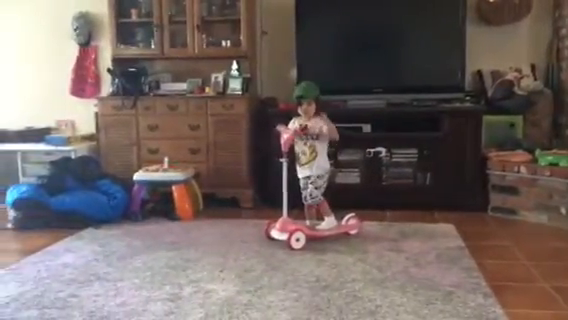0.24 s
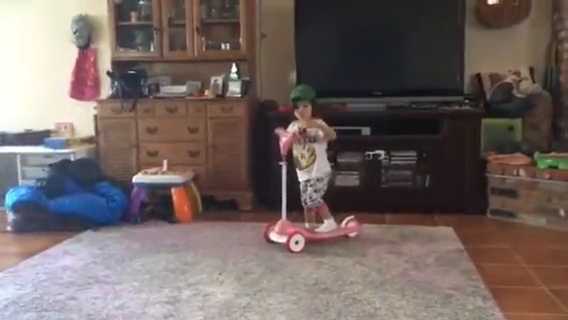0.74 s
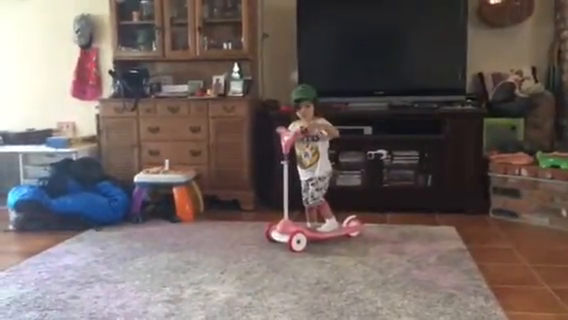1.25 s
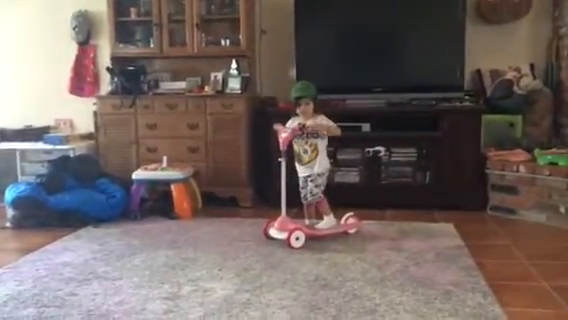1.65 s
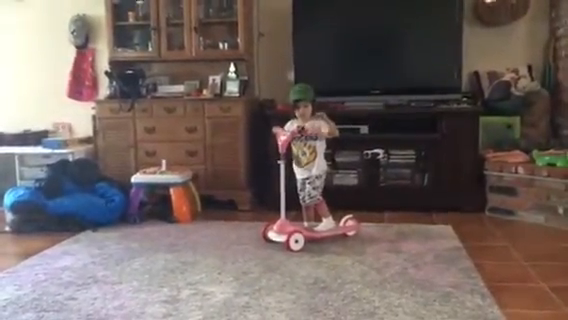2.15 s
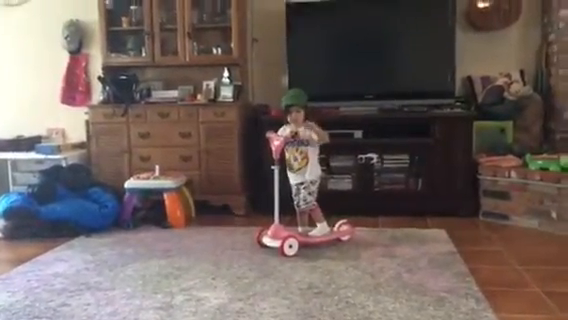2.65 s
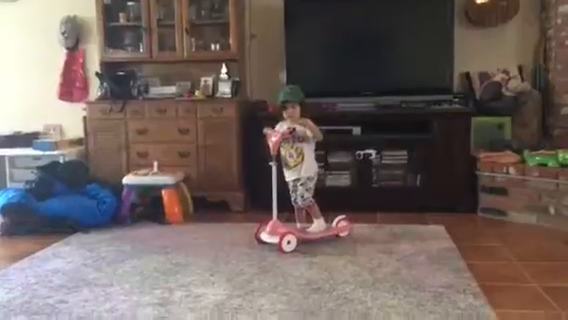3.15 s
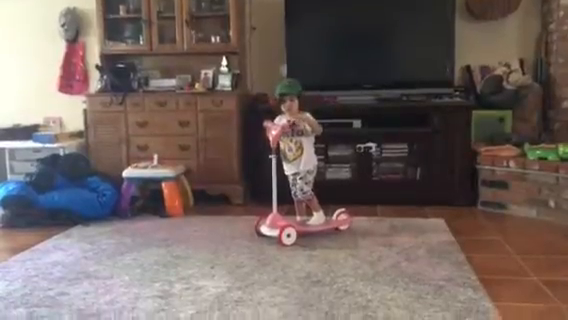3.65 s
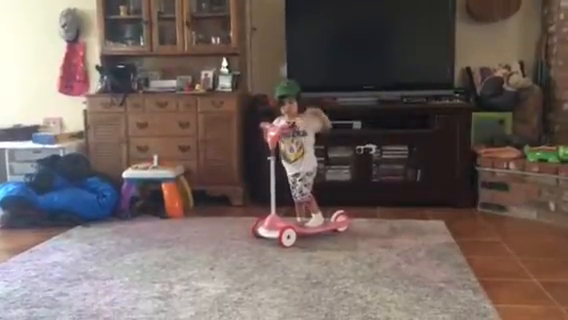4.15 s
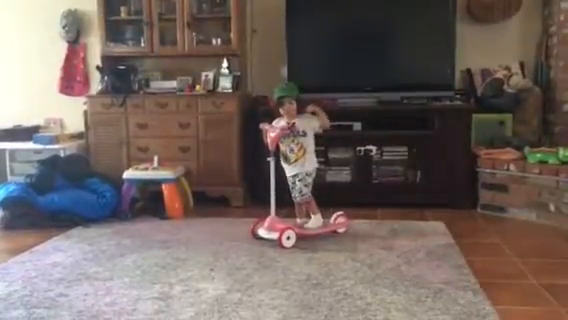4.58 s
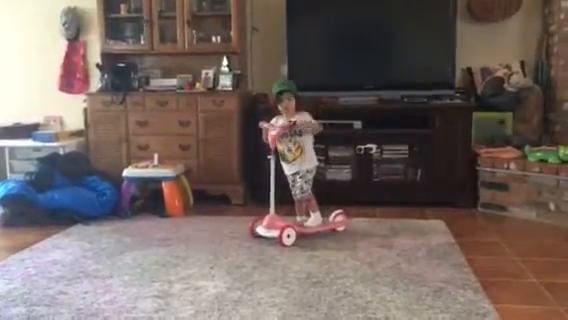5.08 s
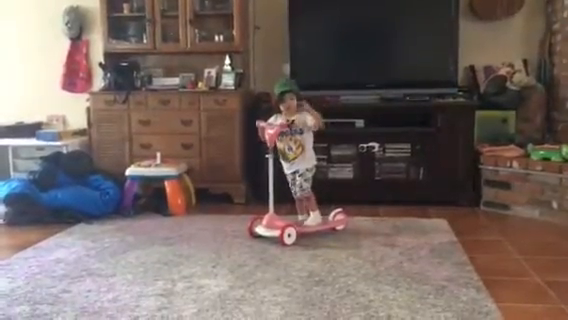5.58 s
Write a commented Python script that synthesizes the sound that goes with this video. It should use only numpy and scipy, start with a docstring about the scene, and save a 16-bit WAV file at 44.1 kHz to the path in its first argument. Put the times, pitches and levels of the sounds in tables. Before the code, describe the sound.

A quiet living room holds a faint low rumble, an appliance hum and a very slight hiss. Right at the start a plastic bell lever gives a light clack, followed by a soft knock. At about 1.7 seconds the lever flicks a small steel scooter bell: a sharp click and a bright, very high ding that rings on, swelling and dipping as it slowly fades. At about 4.1 seconds comes a second, slightly softer ding with a crisp plastic clack; its ring drops away briefly, returns and wavers. At about 5.1 seconds the lever snaps back and grazes the bell, lightly renewing the tone, while the scooter's deck gives a few soft, dull knocks. The ringing is still dying away at the end, near 6 seconds. Tiny dry handlebar ticks are scattered throughout, and the clicks carry a short room echo.

```python
"""In a quiet living room an appliance hums and a child clacks the plastic lever of a small scooter bell.
At 1.7 s the lever flicks a hammer against the steel dome. The dome's few tones ring on, swelling and
fading as the child moves through the room's loud and quiet spots (standing waves).
At 4.1 s the child rings again. At 5.1 s the lever snaps back and grazes the dome,
and the scooter's deck knocks softly while the ringing dies away."""
import sys
import numpy as np
from scipy import signal
from scipy.fft import rfft, irfft
from scipy.io import wavfile

SR = 44100
rng = np.random.default_rng(int(sys.argv[2]) if len(sys.argv) > 2 else 0)


def generate_wav(signal):
    """Clip the signal to [-1, 1] and save it as 16-bit WAV at the path in sys.argv[1]."""
    frames = np.transpose(np.atleast_2d(signal))
    scaled = np.clip(frames, -1, 1) * 32767
    pcm = np.round(scaled).astype(np.int16)
    wavfile.write(sys.argv[1], SR, pcm)


N = 256662
TIME = np.arange(N) / SR
FREQS = np.fft.rfftfreq(4096, 1 / SR)  # pitches in Hz at which a click's tone colour is set

# Blows on the dome; where one lands sets the other tones against the loudest: t/s, ring level/dB,
# crack level/dB, extra for the low pair/dB, extra for the top tone/dB, time to fill the room/s
BLOWS = [(1.683, 0, 1, 1.7, 0, .009), (4.0833, -3, -3.5, 4.1, 0, .018), (5.052, -19, -31, 3.5, -17, .006)]
# The dome's own tones; the lowest two are so close that they beat (pulse against each other):
# f/Hz, base level/dB, t60/s (the time to fade by 60 dB)
DOME_TONES = [(2438.6, -48, 5), (2469.0, -40, 5.4), (6261.4, -17, 2.8), (11360.0, -19, 1.0)]
LOUDEST = 2  # row of the loudest tone


def dome(sway_m=0.0003, shimmer_db=0.43, fill_power=2.2):
    """The struck steel rings with pure tones; small movements of the bell bend the high ones most."""
    delay = sway_m * drift(3.0) / 343  # sound travels 343 m/s
    phases = [2 * np.pi * (hz * (TIME + delay) + rng.random()) for hz, _, _ in DOME_TONES]
    _, ring_db, _, pair_db, top_db, _ = np.transpose(BLOWS)
    blows_db = [ring_db + pair_db, ring_db + pair_db, ring_db, ring_db + top_db]
    out = np.zeros(N)
    for tone, (hz, db, t60) in enumerate(DOME_TONES):
        slowness = (DOME_TONES[LOUDEST][0] / hz) ** fill_power  # low tones fill the room more slowly
        level = ring_level(t60, blows_db[tone], slowness)
        gain, bend = swell(tone)
        out += amp(db + shimmer_db * drift(38)) * level * gain * np.sin(phases[tone] + bend)
    return np.sqrt(2) * (out + sum_tones(phases, blows_db))


def ring_level(t60, blows_db, slowness=1, direct=0.2):
    """Each blow starts the fade afresh; the direct sound comes at once, then the room follows."""
    level, decay = np.zeros(N), amp(-60 * TIME / t60)
    for (s, *_, fill_s), db in zip(BLOWS, blows_db):
        start = round(s * SR)
        old_share = (1 - direct) * np.exp(-TIME[:N - start] / (fill_s * slowness))
        level[start:] = old_share * level[start:] + (1 - old_share) * amp(db) * decay[:N - start]
    return level


# The loudest tone swells in the room's standing waves as the child moves, a curve per blow: t/s, level/dB
SWELL_CURVES = [
    [(1.71, -2), (1.76, -0.1), (2.13, -0.6), (2.28, 4.1), (2.44, 4.4), (2.6, 0.85), (2.77, 4.0),
     (3.72, -3.5), (4.04, 3.5)],
    [(4.11, -1.55), (4.13, 1.5), (4.21, -6.5), (4.27, -27.5), (4.43, -6), (4.56, -11.5), (4.7, -8),
     (4.8, -11.0), (5.01, -8.5)],
    [(5.08, -10), (5.13, -10), (5.18, 1.5), (5.33, -0.9), (5.38, -16.5), (5.41, -8), (5.48, -5), (5.8, -4)],
]
# The two low tones spread in different directions, so as the bell turns one gains on the other
# and their beat deepens: t/s, shift towards the lower tone/dB
LOW_PAIR_BALANCE = [(1.8, -4), (2.05, -1), (2.45, -2), (2.9, -5), (3.3, 6.5), (3.6, 0.9), (4.0, 2),
                    (4.2, 6), (4.45, 0.7), (4.95, -1.4), (5.3, 12), (5.55, 1.1), (5.8, -1.9)]
WAVER_DB, WAVER_HZ = -1.5, 2  # the quieter tones waver a little
SETTLE_DB, SETTLE_S, SETTLE_HZ = 1, .12, 18  # and flutter while the room settles after a blow
THROB_HZ, THROB_STRENGTH, THROB_FADE_S, THROB_PEAK_S = 11.8, 0.61, .4, 0.027  # the top tone's beat


def swell(tone, turn=.8, steps=4096):
    """How strongly one tone reaches the listener, and how its wave shifts as it passes through a fade."""
    t = np.linspace(0, N / SR, steps)
    starts = np.array([s for s, *_ in BLOWS])
    last_blow = np.maximum(np.searchsorted(starts, t) - 1, 0)
    age = abs(t - starts[last_blow])
    if tone == LOUDEST:
        gain = amp(np.interp(t, *np.vstack(SWELL_CURVES).T))
    else:
        waver, settle = (np.interp(t, TIME, drift(hz)) for hz in (WAVER_HZ, SETTLE_HZ))
        gain = amp(WAVER_DB * waver + SETTLE_DB * np.exp(-age / SETTLE_S) * settle)
    if tone < LOUDEST:
        balance_db = np.interp(t, *np.transpose(LOW_PAIR_BALANCE))
        gain *= amp((-1) ** tone * balance_db / 2)  # one goes up as the other goes down
    if tone > LOUDEST:
        depth = np.tanh(THROB_STRENGTH * np.exp(-age / THROB_FADE_S))
        gain *= abs(1 + depth * np.exp(2j * np.pi * THROB_HZ * (age - THROB_PEAK_S)))
    bend = -turn * signal.hilbert(np.log(gain)).imag
    return np.interp(TIME, t, gain), np.interp(TIME, t, bend)


# Dome tones that combine: first row, second row of DOME_TONES
TONE_PAIRS = [(1, 1), (0, 2), (1, 2), (2, 2), (1, 3)]
# The tone that each pair makes: base level/dB, t60/s
PAIR_SUMS = [(-68, 2.8), (-59, 1.7), (-55, 1.8), (-55, 1.4), (-60, 1.2)]


def sum_tones(phases, blows_db, gain_db=-1, flutter_db=1.5):
    """The flexing dome adds faint tones, each at the sum of two of its frequencies."""
    out = np.zeros(N)
    for (a, b), (db, t60) in zip(TONE_PAIRS, PAIR_SUMS):
        level = ring_level(t60, blows_db[a] + blows_db[b])  # adding dB multiplies the two strengths
        out += amp(gain_db + db + flutter_db * drift(7)) * level * np.sin(phases[a] + phases[b])
    return out


# Tone colour of steel hitting steel: f/Hz, relative level/dB
CRACK_COLOUR = [(200, -43.5), (600, -15.5), (1500, -26), (2400, -2.5), (3500, -17.5), (5500, -19),
                (7500, -1.5), (9500, 4), (12000, -0.5), (14000, -0.5), (16000, -13)]


def hammer():
    """Steel meets steel: one sharp, bright crack for each blow."""
    out = np.zeros(N)
    for s, _, db, *_ in BLOWS:
        add(out, s, amp(db) * click(curve_at(CRACK_COLOUR, FREQS)))
    return out


# Clacks of the lever: t/s, relative level/dB, treble tilt/(dB per octave), boost from the hollow/dB
LEVER_CLACKS = [(.0965, -28.5, -4.5, 12.5), (.098, -24.5, 3, 10), (1.6728, -14, 5.5, 18.5),
                (1.6809, -29, -1, -1), (4.0785, -25, 2, 1), (4.081, -52, -8.5, 13.5),
                (4.0835, -11.5, 7, 27.5), (5.0515, -22.5, 2, 8), (5.064, -25.5, -2.5, 27)]
# Tone colour of the plastic: f/Hz, relative level/dB
LEVER_COLOUR = [(150, -9), (320, -6), (560, 4.5), (900, -7), (1150, 6), (1500, -9), (2000, 4.5), (3300, -3),
                (4200, -5.5), (6200, -10), (9000, -4.5), (10500, -12), (11900, -1.5), (15500, -12)]
# The note of the air in the hollow under the dome: f/Hz, half-width/Hz
HOLLOW_NOTE = (2420, 170)


def lever(gain_db=-1, t60=0.026, push=0.21):
    """The plastic lever snaps and stirs the air under the dome."""
    out = np.zeros(N)
    octaves = np.log2(FREQS / np.median(FREQS) + .01)
    hollow_hz, half_width_hz = HOLLOW_NOTE
    hollow = 1 / (1 + ((FREQS - hollow_hz) / half_width_hz) ** 2)
    for s, db, tilt_db, hollow_db in LEVER_CLACKS:
        pulse = click(curve_at(LEVER_COLOUR, FREQS) + tilt_db * octaves + hollow_db * hollow)
        add(out, s, amp(gain_db + db) * np.convolve(pulse, clatter(t60, push)))
    return out


# Ticks of the bell's mount and the handlebar, plus the bright 2-5 kHz edge of the lever's clack at the second
# blow (the loud row at 4.0864 s): t/s, level/dB, f/Hz, width/octaves
HANDLEBAR_TICKS = [(.985, -51, 2600, .2), (1.599, -49, 3400, .15), (2.221, -44, 3400, .5),
                   (2.813, -51, 4200, .4), (3.348, -49, 4000, .4), (4.0864, -15, 3800, .6),
                   (4.3115, -43, 5500, .7), (4.3505, -37, 4000, .8), (4.752, -48, 12500, .3),
                   (5.2765, -41, 4400, .2), (5.51, -46, 11500, .3)]


def handlebar():
    """The bell's mount and the handlebar give small, dry ticks; the lever's clack at the second blow gets its
    bright edge here too."""
    return taps(HANDLEBAR_TICKS, t60=0.032)


# Knocks of the scooter's deck: t/s, level/dB
DECK_KNOCKS = [(.43, -42), (4.971, -43.5), (5.143, -39.5), (5.188, -48)]


def deck(hz=650, width_octaves=0.72):
    """The board that the child stands on knocks softly, always around the same dull pitch."""
    return taps([(s, db, hz, width_octaves) for s, db in DECK_KNOCKS], t60=.025)


def bloom(gain_db=-3, fade_s=0.013, tilt_db=-3):
    """A short burst of the dome's tones: their sudden start stirs nearby pitches in the room."""
    t, out = TIME[:len(FREQS)], np.zeros(N)
    burst = np.zeros(len(t))
    for hz, db, _ in DOME_TONES:
        octaves = np.log2(hz / DOME_TONES[LOUDEST][0])
        burst += amp(db + tilt_db * octaves) * np.sin(2 * np.pi * hz * t)
    for s, db, *_ in BLOWS:
        add(out, s, amp(gain_db + db) * burst * np.exp(-t / fade_s))
    return out


# First echoes from the floor and furniture: delay/s, level/dB
FIRST_ECHOES = [(.0032, -2.5), (.0078, -6.5), (0.01, -16.5), (0.014, -2.5), (.0335, -24.5)]


def early_echoes(hits, scatter_t60=0.0047, spray_db=-4, spray_t60=.12):
    """Sound bounces off the floor and furniture; things close by scatter a quick spray of tiny echoes."""
    out = np.zeros(N)
    for s, db in FIRST_ECHOES:
        add(out, s, amp(db) * signal.oaconvolve(hits, clatter(scatter_t60, push=0.62)))
    spray = rng.standard_normal(SR) * (rng.random(SR) < .05)
    spray *= amp(-60 * TIME[:SR] / spray_t60)
    spray /= np.linalg.norm(spray)
    add(out, FIRST_ECHOES[0][0], amp(spray_db) * signal.oaconvolve(hits, spray))
    return out


# How long the room rings: f/Hz, t60/s
ROOM_FADE = [(250, 1), (700, 0.36), (1800, 0.46), (4600, 0.45), (9000, 0.25), (14000, 0.27)]


def room_tail(hits, bursts, low_db=6, high_db=-2, split_hz=4000, rise_s=.005):
    """Many echoes blur into a tail; lower sound spreads widest and stirs it most, the treble dies first."""
    hz, t, noise = signal.stft(rng.standard_normal(SR), SR, nperseg=256)
    fade = amp(-60 * t / curve_at(ROOM_FADE, hz)[:, None])
    tail = signal.istft(noise * fade, SR)[1][:SR]
    tail *= 1 - np.exp(-TIME[:SR] / rise_s)
    lows = signal.lfilter(*signal.butter(1, split_hz, fs=SR), hits)
    spread = amp(high_db) * (hits - lows) + amp(low_db) * lows + bursts
    return signal.oaconvolve(spread, tail / np.linalg.norm(tail))[:N]


# Tone colour of the quiet room: f/Hz, relative level/dB
AIR_COLOUR = [(12, -32), (20, -17), (68, 1.5), (126, -9), (145, -8.5), (176, -11.5), (227, -14.5),
              (300, -9.5), (326, -19.5), (355, -14.5), (443, -18), (482, -20), (1950, -35.5), (2800, -35),
              (15800, -58.5)]


def room_air(level_db=-64):
    """The room's faint, steady rumble."""
    return amp(level_db) * unit(coloured_noise(AIR_COLOUR))


# Tones of a household appliance: f/Hz, level/dB
HUM_TONES = [(59.5, -78.5), (119, -73.5), (172.3, -74.5), (258.4, -85.5), (296.1, -82.5), (355.3, -83)]


def appliance(waver_db=2, wander_rad=0.92):
    """An appliance hums; each tone wavers a little in loudness and pitch."""
    out = np.zeros(N)
    for hz, db in HUM_TONES:
        level = amp(db + waver_db * drift(2.4))
        out += level * np.sin(2 * np.pi * hz * TIME + wander_rad * drift(2))
    return np.sqrt(2) * out


# Tone colour of the hiss: f/Hz, relative level/dB
HISS_COLOUR = [(1000, 4), (10000, -1), (12000, 5), (15500, 4)]


def microphone_hiss(gain_db=-77.5):
    """A microphone makes a very faint, even hiss of its own."""
    return amp(gain_db) * coloured_noise(HISS_COLOUR)


def taps(rows, t60, skirt_db=-26):
    """Light taps, each strongest around one pitch, with a weak skirt of sound on either side."""
    out = np.zeros(N)
    for s, db, hz, width in rows:
        octaves = np.log2((FREQS + 1) / hz)
        hump = np.exp(-(octaves / width) ** 2) + amp(skirt_db) / (1 + octaves ** 2)
        add(out, s, amp(db) * np.convolve(click(20 * np.log10(hump)), clatter(t60)))
    return out


def clatter(t60, push=0.305):
    """A thin part spreads a blow over a first push and a dense, short ring, leaving its colour alone."""
    t = TIME[:len(FREQS)]
    rattle = unit(rng.standard_normal(len(t)) * amp(-60 * t / t60))
    rattle[0] += push * np.sqrt(len(t))
    spectrum = rfft(rattle, 2 * len(t) - 2)
    colour = rfft(click(20 * np.log10(abs(spectrum))))
    spread = irfft(spectrum / colour)[:len(t)]  # dividing takes out the rattle's own colour
    return spread / np.linalg.norm(spread)


def click(colour_db):
    """The sharpest click that has this tone colour, with energy 1."""
    log_gain = np.log(amp(np.r_[colour_db, colour_db[-2:0:-1]]))
    spectrum = np.exp(np.conj(signal.hilbert(log_gain)))  # packs the energy at the start
    pulse = np.fft.ifft(spectrum).real
    return pulse / np.linalg.norm(pulse)


def coloured_noise(colour):
    """Steady noise shaped by a table of f/Hz, level/dB."""
    gain = amp(curve_at(colour, np.fft.rfftfreq(N, 1 / SR)))
    return irfft(rfft(rng.standard_normal(N)) * gain, N)


def drift(rate_hz, steps=4096):
    """A smooth random wander whose typical size is 1."""
    hz = np.fft.rfftfreq(steps, N / SR / steps)
    keep_slow = np.exp(-(hz / rate_hz) ** 2) * (hz > 0)
    wander = unit(irfft(rfft(rng.standard_normal(steps)) * keep_slow))
    return np.interp(np.arange(N) * steps / N, np.arange(steps), wander)


def curve_at(points, hz):
    """Reads between a table's rows, with octaves evenly spaced."""
    f, value = np.transpose(points)
    return np.interp(np.log(hz + 1), np.log(f + 1), value)


def add(mix, s, sound):
    """Mixes a sound in, starting at s seconds."""
    part = mix[round(s * SR):][:len(sound)]
    part += sound[:len(part)]


def amp(db):
    """Turns decibels into a number to multiply by."""
    return 10 ** (np.asarray(db) / 20)


def unit(x):
    """Scales a signal to a typical size (rms) of 1."""
    return x / np.sqrt(np.mean(x ** 2) + 1e-20)


def scene(cracks_to_room_db=-5, ticks_to_room_db=-8):
    """The bell, the scooter, their echoes and the quiet background, in one channel."""
    cracks, ticks = hammer(), handlebar()
    plastic = lever() + deck()
    # the bright cracks and ticks beam at the listener and stir the room less
    hits = plastic + amp(cracks_to_room_db) * cracks + amp(ticks_to_room_db) * ticks
    echoes = early_echoes(hits) + room_tail(hits, bloom())
    hiss = microphone_hiss()
    return (dome() + cracks + ticks + plastic + echoes + room_air() + appliance() + hiss)[None]


def record(dry, top_hz=15850):
    """Cuts away the very highest treble."""
    low_pass = signal.firwin(511, top_hz, window=("kaiser", 9), fs=SR)
    return signal.oaconvolve(dry, low_pass[None], "same")


dry = scene()
out = record(dry)
generate_wav(out)
```